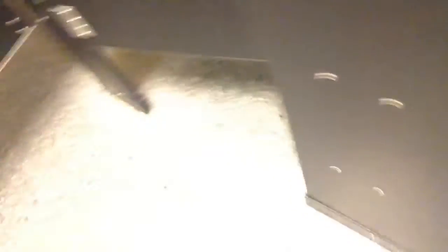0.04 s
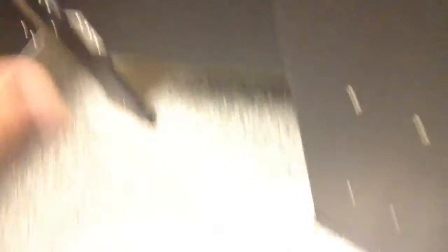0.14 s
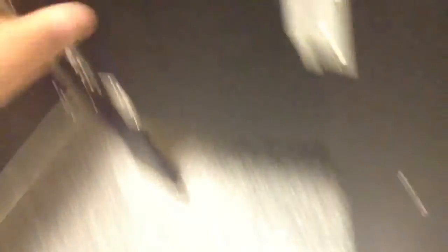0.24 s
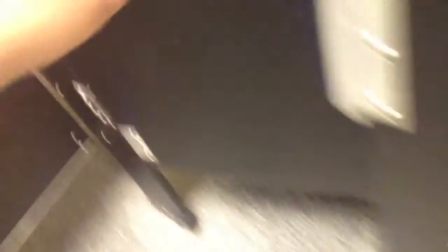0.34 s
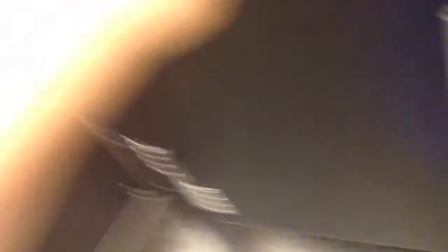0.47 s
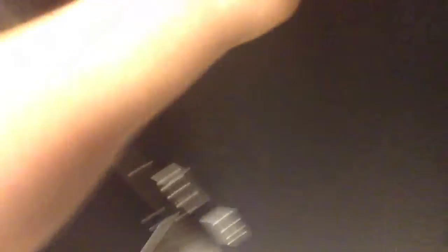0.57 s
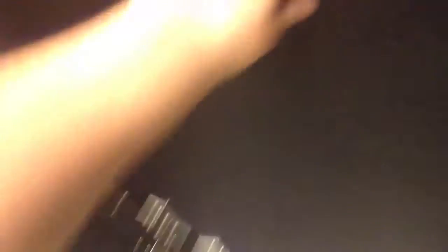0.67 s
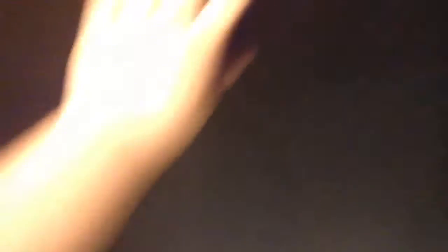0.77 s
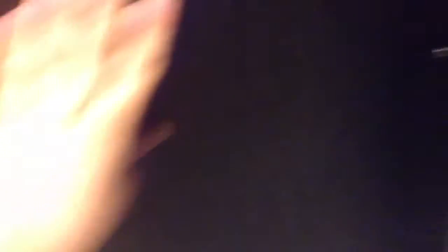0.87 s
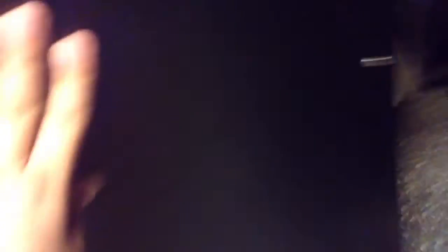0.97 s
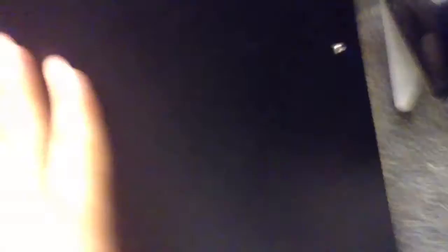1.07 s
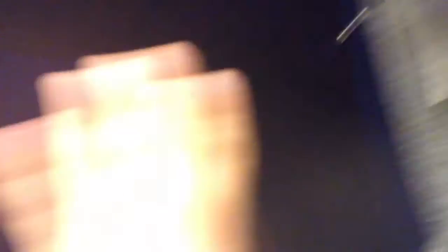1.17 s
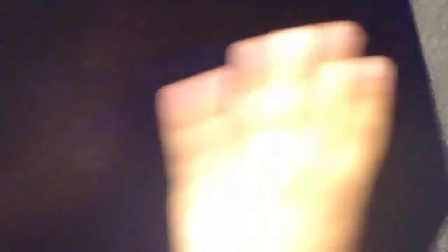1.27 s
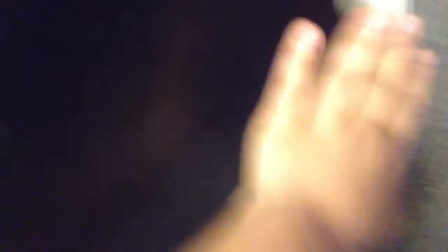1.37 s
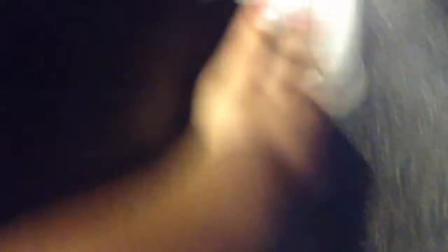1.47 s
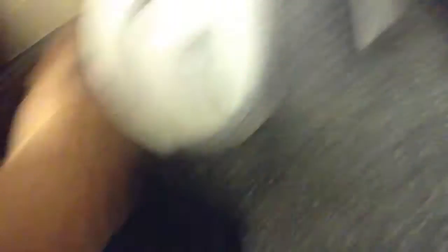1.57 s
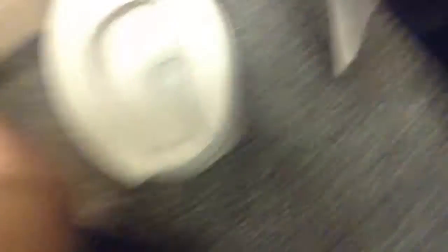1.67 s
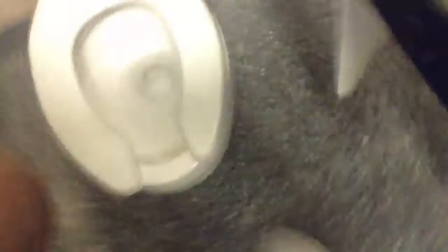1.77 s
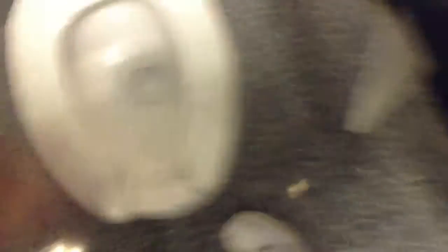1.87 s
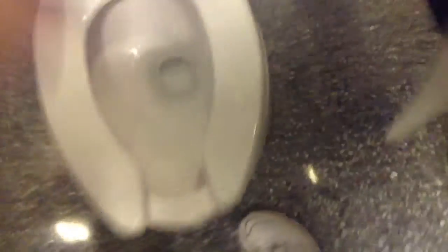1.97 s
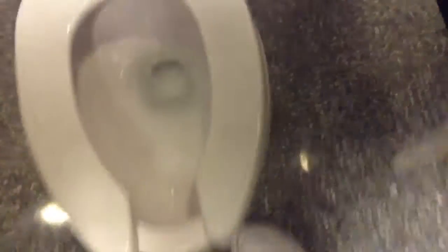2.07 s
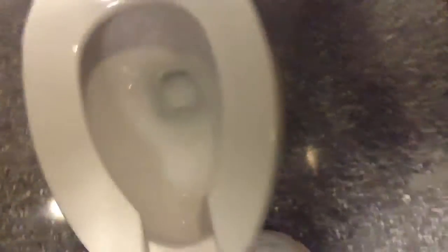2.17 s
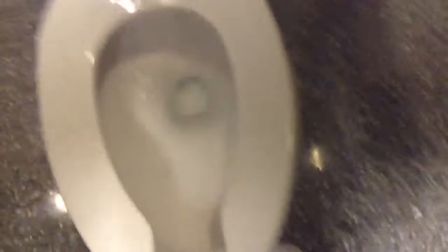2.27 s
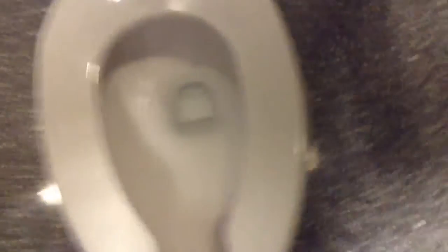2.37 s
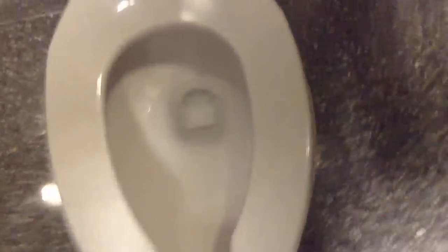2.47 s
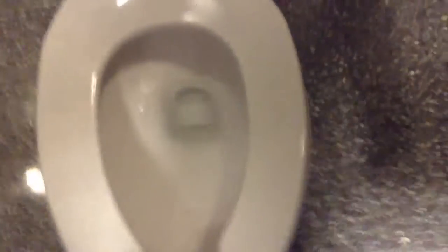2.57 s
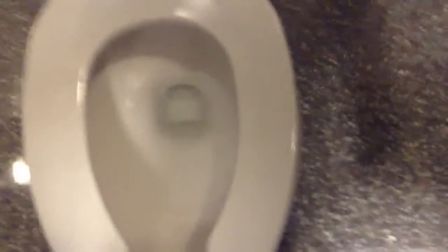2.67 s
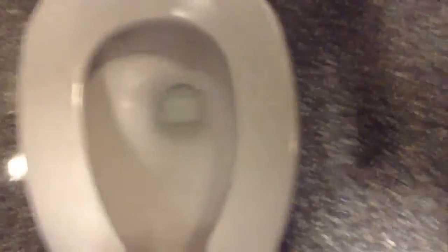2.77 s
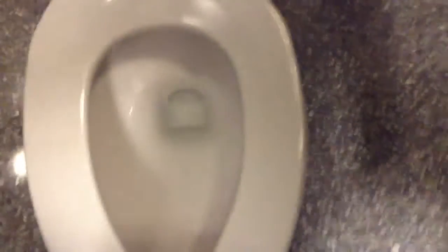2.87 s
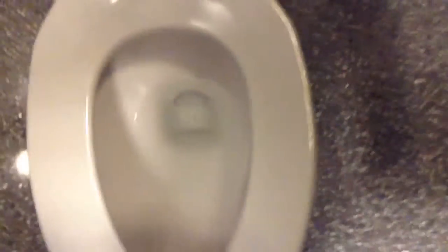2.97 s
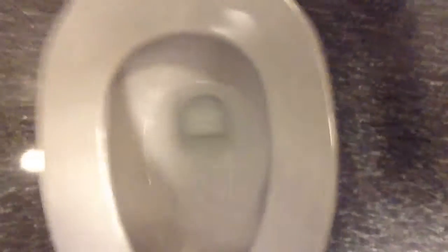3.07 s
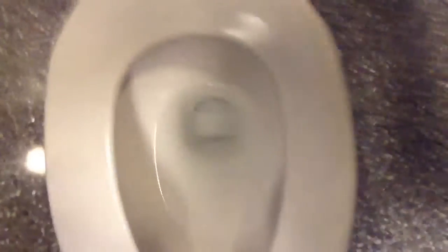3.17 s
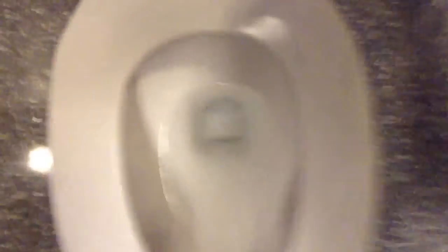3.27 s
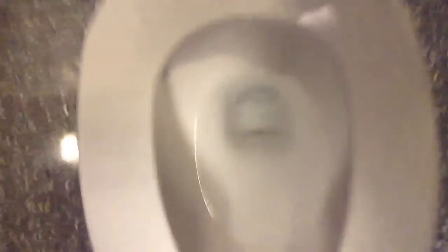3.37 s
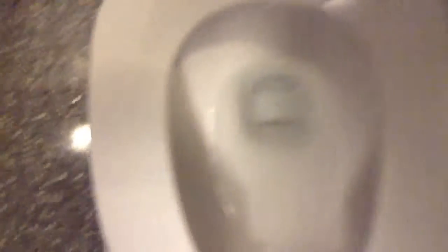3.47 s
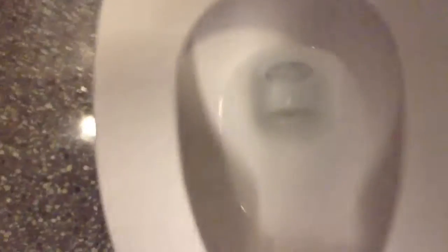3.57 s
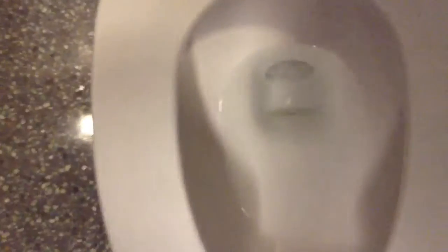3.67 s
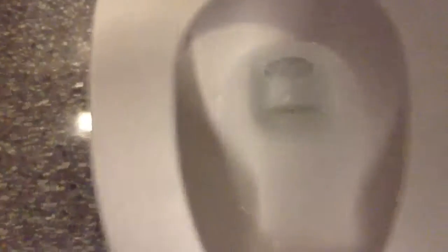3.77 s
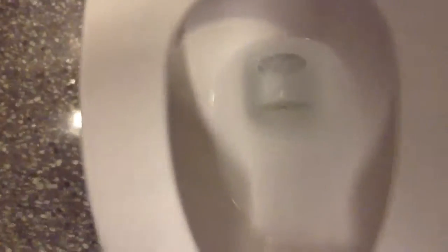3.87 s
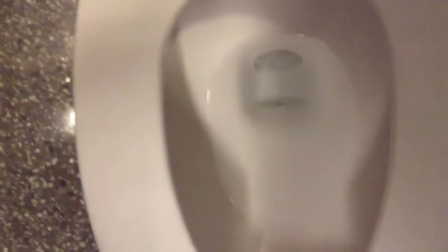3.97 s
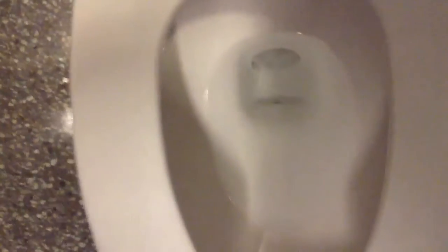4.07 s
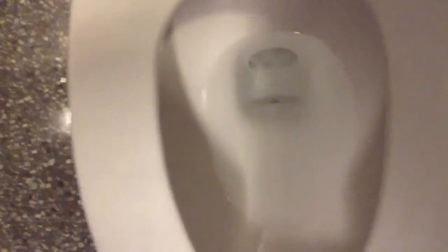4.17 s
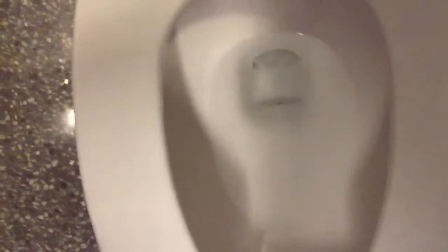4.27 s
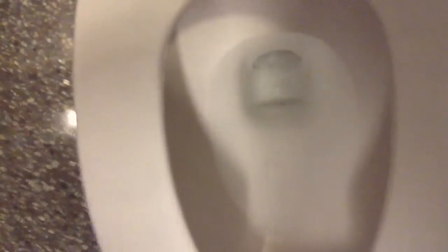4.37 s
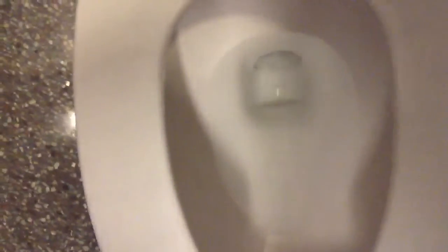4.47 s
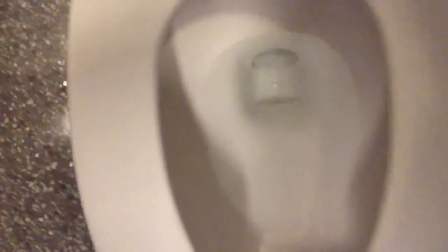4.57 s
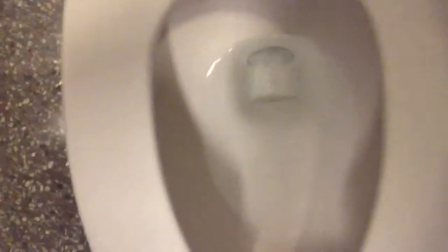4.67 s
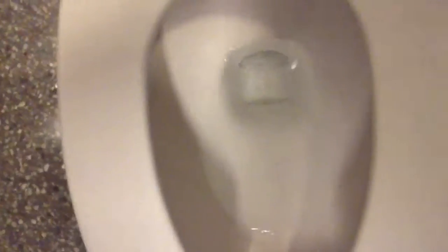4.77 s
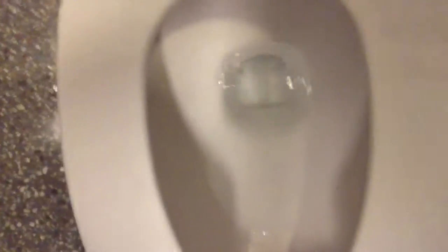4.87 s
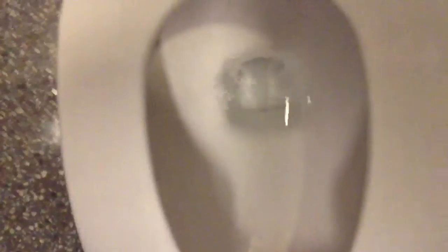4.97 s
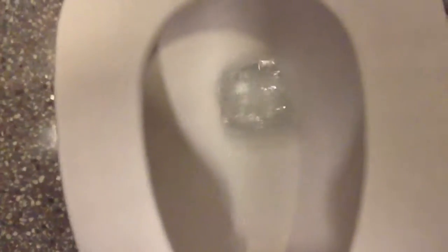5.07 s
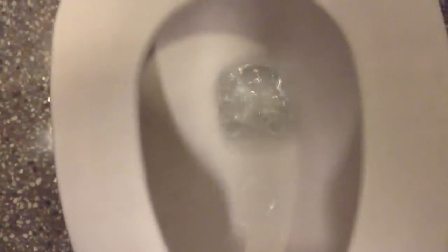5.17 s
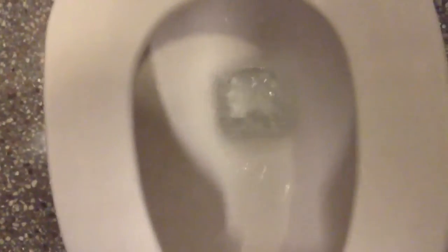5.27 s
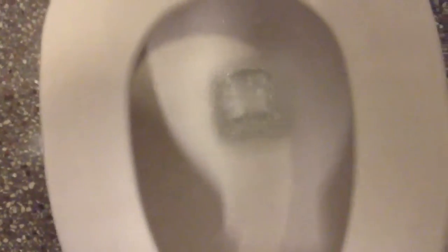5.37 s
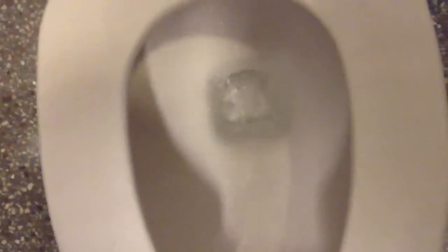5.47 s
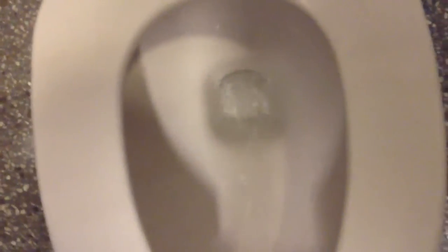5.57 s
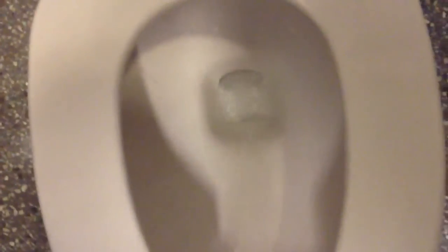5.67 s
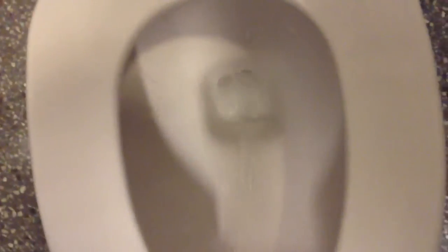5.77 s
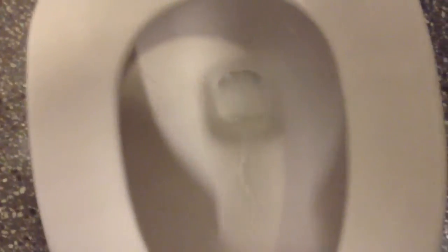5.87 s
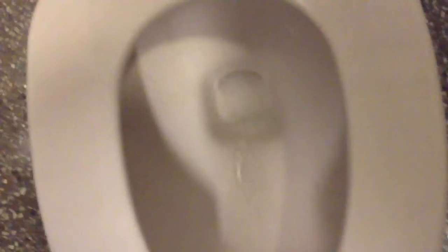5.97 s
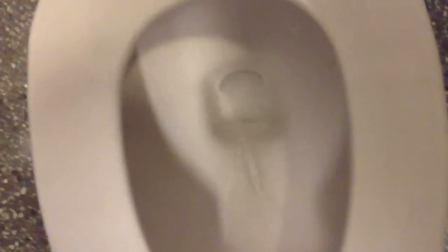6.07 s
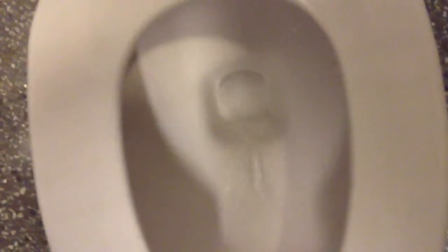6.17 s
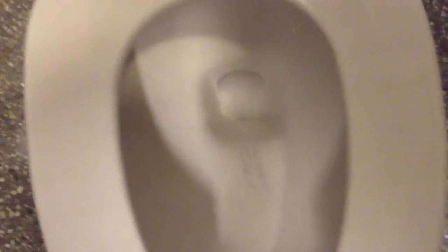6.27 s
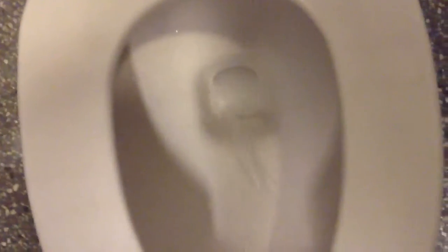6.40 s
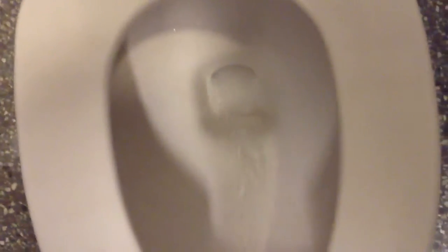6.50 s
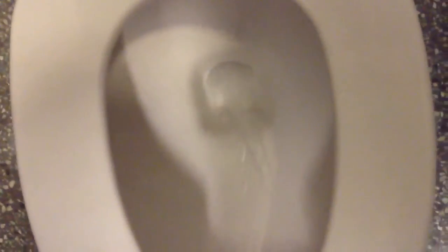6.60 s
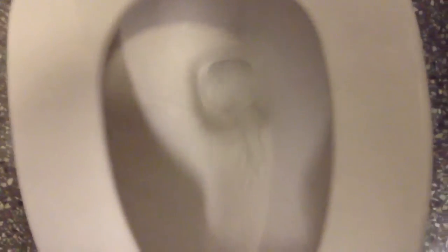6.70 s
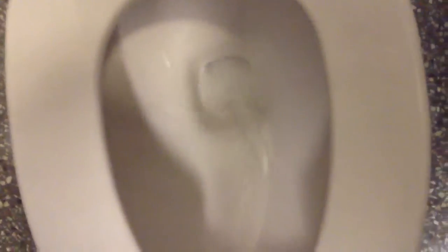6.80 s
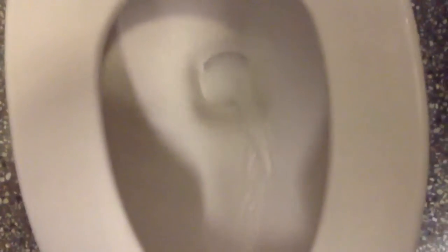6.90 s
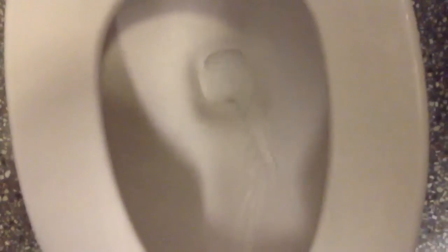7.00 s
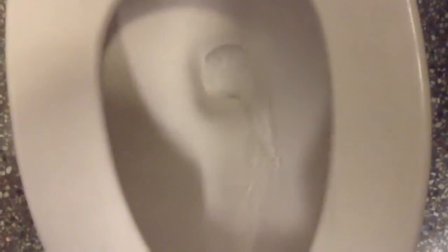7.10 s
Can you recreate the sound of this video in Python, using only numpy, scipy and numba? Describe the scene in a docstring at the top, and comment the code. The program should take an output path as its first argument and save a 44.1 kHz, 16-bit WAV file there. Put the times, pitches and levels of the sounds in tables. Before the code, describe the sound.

A small tiled restroom with short, bright echo and very quiet low ventilation. From 0 to 4 s someone moves about: dull bumps around 0.5, 1.1 and 2.6 s, gritty shoe shuffles, faint sleeve rustle, thin squeaks, and short door and metal-fitting clacks, clearest near 0.8, 1.2, 1.7 and 3.7 s. Dry finger taps touch the microphone around 1.3 and 2.4-2.6 s. At 4.15 s the flush valve clunks open; by 4.4 s a pressure burst hisses with a thin brief whistle, over a low, heaving drone and a wavering pipe note that rises, then sinks by about 5.2 s. Gurgling boils up near 4.9 s, and hiss and drone swell again towards 5.7 s. At 5.77 s the siphon breaks: very loud, close gulps falling in pitch, hard wet slaps, bubbly splashes and fizzing spray surge irregularly, with soft low thumps, continuing until the end just after 7 s.

```python
"""Flushing a restroom toilet

Someone pushes into a tiled stall: door and metal fittings knock as decaying noise bands, shoes scuff and squeak.
A flush valve snaps open; a submerged jet drones in the china bowl, made of many short damped sines (bubbles),
under the hiss of the valve, which is coloured noise.
The bowl empties, the siphon gulps air, and the bared jet splashes loudly close to the microphone."""
import sys
import numpy as np
from scipy import signal
from scipy.fft import rfft, irfft
from scipy.io import wavfile
from scipy.ndimage import uniform_filter1d, minimum_filter1d
from numba import njit

SR = 44100
rng = np.random.default_rng(int(sys.argv[2]) if len(sys.argv) > 2 else 0)


def int16_out(signal):
    """Quantize to a 16-bit WAV file."""
    q = np.round(np.clip(np.atleast_2d(signal).T, -1, 1) * 32767)
    wavfile.write(sys.argv[1], SR, q.astype(np.int16))


N = 314874
TIME = np.arange(N) / SR
TOP_HZ = 15250  # bubbles stay below this pitch, and the final mix is cut above it

# the valve cracks open, is fully open, and the siphon breaks (seconds)
OPEN_S, FULL_S, SIPHON_S = 4.147, 4.4, 5.768
# the first rush of pressure dies away; the water over the jet thins out (time constants in seconds)
SETTLE_S, SHALLOW_S = 0.19, 0.22
ROOM_T60_S, ROOM_TREBLE_T60_S = 0.49, 0.53  # time for the echo to fall 60 dB


def undb(db):
    """Decibels to gain."""
    return 10 ** (np.asarray(db) / 20)


def unit(x):
    """Scale to rms 1."""
    return x / np.sqrt(np.mean(x ** 2) + 1e-20)


def noise_burst(t):
    """White noise, one sample for each moment in t."""
    return rng.standard_normal(len(t))


def after(s, rise_s):
    """A gate that opens at a given time."""
    return np.clip((TIME - s) / rise_s, 0, 1)


def fade(t, t60):
    """Free decay: 60 dB down after t60 seconds."""
    return np.exp(-np.log(1000) * t / max(t60, 1e-3))


def swell(s, length, rise_s, fall_s):
    """An envelope that rises, holds until its length is over, then dies away."""
    fall = np.exp(-np.maximum(TIME - s - length, 0) / max(fall_s, 1e-3))
    return after(s, max(rise_s, 1e-3)) * fall


def hump(s, width_s):
    """A smooth rise and fall around a crest."""
    return np.exp(-((TIME - s) / width_s) ** 2)


def add(out, s, x):
    """Mix a sound in at a given time."""
    i = max(int(s * SR), 0)
    out[i:i + len(x)] += x[:max(N - i, 0)]


def walk(rate):
    """Smooth random wavering with rms 1, drawn anew about rate times a second."""
    k = max(int(SR / rate), 2)
    steps = rng.standard_normal(N)[np.arange(N) // k]
    return unit(uniform_filter1d(steps, k))


def colour(x, points, modes=(), size=8192):
    """Causal filter: a smooth spectrum with resonances raised on it; rms 1 out."""
    f = np.maximum(np.fft.rfftfreq(size, 1 / SR), 1)
    hz, db = np.transpose(points)
    outside = np.abs(np.log(f / np.clip(f, hz[0], hz[-1])))
    curve = np.interp(np.log(f), np.log(hz), db) - 20 * outside
    for centre, width, lift in modes:
        curve = curve + lift / (1 + (2 * (f - centre) / width) ** 2)
    # folding the cepstrum gives a filter that answers at once (minimum phase)
    cepstrum = irfft(np.log(undb(curve)))[:size // 2]
    cepstrum[0] = 0
    response = irfft(np.exp(rfft(2 * cepstrum, size)))[:size // 2]
    return unit(signal.oaconvolve(x, response)[:len(x)])


def band(x, hz, spread):
    """Band-pass reaching a factor 1 + spread to each side; rms 1 out."""
    edges = [hz / (1 + spread), min(hz * (1 + spread), SR / 2 - 100)]
    return unit(signal.sosfilt(signal.butter(2, edges, "band", fs=SR, output="sos"), x))


@njit
def ring(starts, hz, cycles, sizes, glide):
    """Each bubble is a damped sine; a positive glide raises its pitch as it nears the surface."""
    out = np.zeros(N)
    for k in range(len(starts)):
        life = cycles[k] * SR / hz[k]  # in samples
        turn = 2 * np.pi * hz[k] / SR
        z = sizes[k] + 0j
        step = np.exp(1j * turn - 5 / life)
        bend = np.exp(1j * turn * glide / life)
        for i in range(starts[k], min(starts[k] + int(life), N)):
            out[i] += z.imag
            z, step = z * step, step * bend
    return out


def bubbles(centre_hz, octaves, cycles, scatter_db, glide, count):
    """A cloud of count bubbles a second around a pitch; scatter makes most small and a few large."""
    place, pitch, life, size = rng.random((count * N // SR, 4)).T
    starts = (place * N).astype(np.int64)
    centres = (centre_hz * np.ones(N))[starts]
    hz = np.minimum(centres * 2 ** (octaves * (2 * pitch - 1)), TOP_HZ)
    sizes = undb(-scatter_db * np.log(size + .01))
    return unit(ring(starts, hz, cycles * (.5 + life), sizes, float(glide)))


def tiles(x, wet_db):
    """Hard walls close by: a dense echo whose low and high bands each die at their own rate."""
    t = TIME[:SR]
    low = band(noise_burst(t), 705, 2.15) * fade(t, ROOM_T60_S)
    high = band(noise_burst(t), 10200, 2.06) * fade(t, ROOM_TREBLE_T60_S)
    tail = unit((low + 2.57 * high) * np.clip(t / 0.01, 0, 1)) / np.sqrt(SR)
    return x + undb(wet_db) * signal.oaconvolve(x, tail)[:N]


# Tone of the ventilation. Each row: frequency in Hz, level in dB.
AIR_COLOUR = [(30, -28), (70, -8), (130, 0.5), (220, 1.5), (330, -7), (450, -26), (650, -13.5),
              (1000, -16.5), (2200, -15.5), (4500, -35), (6500, -27), (15000, -34.5)]


def ventilation(level_db=-62.5):
    """Moving air makes a low noise whose level wavers gently."""
    return undb(level_db + walk(3.55)) * colour(rng.standard_normal(N), AIR_COLOUR)


# Soft bumps of hand and feet. Each row: start in seconds, level in dB, pitch in Hz, 60 dB decay in seconds.
SOFT_BUMPS = [(.395, -51, 290, 0.69), (0.486, -40.5, 320, 0.26), (.52, -47, 475, 0.17),
              (1.082, -35, 162, 0.37), (1.113, -39, 170, .3), (1.16, -43, 157, 0.59), (1.2, -49, 300, 0.5),
              (1.335, -41, 230, 0.25), (1.573, -44.5, 163, 0.46), (1.614, -45, 199, 0.095),
              (1.994, -41.5, 275, 0.24), (2.555, -30, 170, 0.034), (2.646, -38, 199, 0.033)]
# Faint thin tones and short scrapes.
# Each row: start in seconds, length in seconds, pitch in Hz, level in dB, width relative to the pitch.
FAINT_TONES = [(0.005, 0.021, 990, -51.5, 0.65), (0.106, 0.089, 4170, -70.5, 0.016),
               (0.206, 0.074, 1970, -63, 0.023), (0.492, 0.031, 3330, -52, .03),
               (0.517, 0.1, 7950, -67, 0.05), (0.686, 0.077, 4530, -53.5, 0.15),
               (0.975, 0.053, 1800, -57.5, .06), (1.444, 0.076, 5370, -62.5, 0.24),
               (2.37, 0.043, 4770, -67, .1), (2.798, 0.048, 2840, -60, .08), (3.038, 0.067, 2500, -59, .1),
               (3.366, 0.057, 2970, -62, .06), (3.977, 0.11, 1330, -62, 0.044)]
# Shoes shuffle on the tiles. Each row: start in seconds, length in seconds, level in dB.
SHOE_SHUFFLES = [(0.25, 0.1, -62), (0.397, 0.19, -51.5), (0.68, 0.13, -51), (1.11, 0.32, -53),
                 (1.835, 0.16, -54.5), (2.35, 0.12, -55.5), (3.047, 0.03, -78), (3.31, 0.05, -71),
                 (3.74, 0.16, -61.5)]
# Sleeves rustle. Each row: start in seconds, length in seconds, level in dB.
SLEEVE_RUSTLES = [(0.0, 0.019, -60), (0.396, 0.1, -62.5), (1.24, 0.16, -64.5), (1.464, 0.15, -66.5),
                  (1.987, 0.066, -61), (2.378, 0.27, -62.5)]


def movement(grit_db=-62, cloth_db=-79):
    """Bumps, thin tones and scrapes are bands of noise; shoes and sleeves are clouds of tiny damped sines."""
    out, t = np.zeros(N), TIME[:SR // 2]
    for s, db, hz, t60 in SOFT_BUMPS:
        thud = band(band(noise_burst(t), hz, 0.54), hz, 0.54)
        add(out, s, undb(db) * thud * fade(t, t60) * np.minimum(t / 0.003, 1))
    for s, length, hz, db, width in FAINT_TONES:
        arch = np.sin(np.pi * np.minimum(t / length, 1))
        add(out, s, undb(db) * band(noise_burst(t), hz, width) * arch)
    grit = bubbles(1320, octaves=2.066, cycles=10.3, scatter_db=4.0, glide=0, count=4000)
    grit_colour = [(200, 15), (450, -8.5), (650, 1), (1200, -2), (2200, -1), (4500, 0.5), (7000, -12.0)]
    grit = colour(grit, grit_colour)  # (Hz, dB)
    cloth = bubbles(5300, octaves=0.83, cycles=1.2, scatter_db=1.5, glide=0, count=3000)
    scuff = sum(undb(db) * swell(s, length, 0.047, 0.089) for s, length, db in SHOE_SHUFFLES)
    rustle = sum(undb(db) * swell(s, length, 0.0067, 0.023) for s, length, db in SLEEVE_RUSTLES)
    # a faint stir goes on, then fades as the person comes to stand still at the bowl
    walking = swell(0, 2.7, 0.0036, 1.0)
    scuff = np.hypot(scuff, undb(grit_db) * walking)
    rustle = np.hypot(rustle, undb(cloth_db) * walking)
    return out + scuff * grit + rustle * cloth


# Knocks of door, fittings and shoes. Each row: start in seconds, level in dB, main pitch in Hz,
# brightness in dB, 60 dB decay in seconds, contact time in seconds.
DOOR_KNOCKS = [(0.393, -45, 530, -17, 0.16, 0.0016), (0.485, -41, 993, -32, 0.046, 0.0015),
               (0.758, -40, 1350, -21, 0.075, 0.002), (0.796, -28.5, 2440, -21, 0.05, 0.0025),
               (1.165, -26, 1440, -47, 0.053, 0.0027), (1.229, -33.5, 2400, -16, 0.051, 0.0012),
               (1.331, -43.5, 800, -36, 0.13, 0.0022), (1.574, -48.5, 600, -25, 0.16, 0.0016),
               (1.714, -28.5, 2240, 1, 0.13, 0.0024), (1.995, -38.5, 720, -43, 0.18, 0.0025),
               (2.47, -36.5, 2100, -39, 0.11, 0.0025), (2.872, -36, 2050, -2.5, 0.11, 0.0032),
               (3.246, -36, 1920, -28, 0.11, 0.0052), (3.519, -42, 2040, -7, 0.12, 0.0011),
               (3.731, -27.5, 2100, -8.5, 0.086, 0.0048), (4.158, -30, 2440, 10, 0.018, 0.0012)]
# Tone of the clack. Each row: frequency in Hz, level in dB.
CLACK_COLOUR = [(100, -10.5), (300, -3), (700, -1.5), (1300, 9), (2100, 7), (3400, 2), (4700, -5),
                (6000, -57), (9000, -19), (15000, -71)]
# Ringing of the steel fitting. Each row: frequency in Hz, level in dB, 60 dB decay in seconds.
STEEL_MODES = [(1988, -6, 0.12), (2210, -2, 0.089), (3400, 3.5, 0.047), (4570, -5.5, 0.17),
               (6700, -8, 0.077), (7750, -7, 0.13), (8940, -7, 0.17), (11300, -31, 0.1), (14950, -20, 0.13)]


def knocks(metal_db=-10, metal_slope=0.27, overtone=2.234, overtone_db=-11):
    """Panel and latch clatter briefly; the steel fitting rings on, its modes smeared by its loose seat."""
    out, t = np.zeros(N), TIME[:SR // 2]
    for s, db, hz, bright_db, t60, contact_s in DOOR_KNOCKS:
        noise = noise_burst(t)
        clack = undb(-3.5) * (colour(noise, CLACK_COLOUR) + band(noise_burst(t), hz, 0.21))
        clack = clack + undb(bright_db - 12.5) * band(noise, 9800, 0.51)
        clack = clack + undb(overtone_db) * band(noise_burst(t), overtone * hz, 0.097)
        # dull contacts wake the high modes less
        hardness_db = metal_slope * min(bright_db - 1, 0)
        metal = 0
        for mode_hz, mode_db, life in STEEL_MODES:
            gain = undb(mode_db + hardness_db * np.log2(mode_hz / 1900))
            metal = metal + gain * band(noise, mode_hz, 0.018) * fade(t, life)
        contact = np.minimum(t / max(contact_s, 1e-4), 1)
        add(out, s - .001, undb(db) * contact * (clack * fade(t, t60) + undb(metal_db) * metal))
    return out


# Fingers tap on the microphone's housing.
# Each row: start in seconds, level in dB, pitch in Hz, 60 dB decay in seconds.
FINGER_TAPS = [(1.344, -42.5, 2050, .032), (2.4155, -37.5, 2250, .036), (2.5562, -41.5, 3100, .028),
               (2.6462, -44.5, 3400, .026)]


def ticks():
    """Taps on the housing are short noise bands that never reach the room, so they stay dry."""
    out, t = np.zeros(N), TIME[:SR // 8]
    for s, db, hz, t60 in FINGER_TAPS:
        add(out, s, undb(db) * band(noise_burst(t), hz, 0.61) * fade(t, t60))
    return out


def rush(hold_s=0.043):
    """The burst of pressure as the valve opens fully, 0-1."""
    return swell(FULL_S, hold_s, 0.037, SETTLE_S)


def shallow():
    """How bare the jet lies as the bowl empties, 0-1."""
    return np.exp(np.minimum(TIME - SIPHON_S, 0) / SHALLOW_S)


# Tone of the drone. Each row: frequency in Hz, level in dB.
JET_COLOUR = [(40, -72), (80, -30.5), (125, -36.5), (200, -21), (270, -3), (320, 5), (360, -18), (450, -17),
              (600, -76)]
# Low modes of the filled bowl and trap. Each row: frequency in Hz, width in Hz, lift in dB.
BOWL_TRAP_MODES = [(160.4, 4.9, 11), (219.3, 10.1, 16.5), (303, 28, 3.5), (403, 20, 10.5)]
# The water heaves over the jet. Each row: time of the crest in seconds, lift in dB.
WATER_HEAVES = [(4.295, 6), (4.355, 2), (4.39, 9.5), (4.484, 10.5), (4.576, 8), (4.68, 5.5), (4.911, 10.5),
                (5.006, 11), (5.317, 9), (5.44, 5), (5.53, 2), (5.615, 7), (5.699, 7), (6.29, 9), (6.68, 8)]


def drone(throb_db=0.8, body_db=-28.5, shallow_db=9, drained_db=-15, heave_width_s=0.017,
          rumble_db=-44, rush_db=10, ebb_db=-9, ebb_s=5.28, deep_hz=270, shallow_octaves=1.0):
    """The turbulent jet shakes the water and the low modes of bowl and trap; the drain rumbles below."""
    # louder and higher as the water thins, weak once the bowl has drained
    drained = after(SIPHON_S - .05, 0.099)
    depth_db = shallow_db * shallow() + drained_db * drained
    hz = deep_hz * 2 ** (shallow_octaves * shallow() * (1 - drained))
    body = bubbles(hz, octaves=0.84, cycles=1.92, scatter_db=2, glide=0.077, count=1500)
    body = colour(body, JET_COLOUR, BOWL_TRAP_MODES)
    # steady supply pressure holds the power even from moment to moment
    body = body / np.sqrt(uniform_filter1d(body ** 2, int(0.061 * SR)) + 1e-3)
    heave_db = sum(db * hump(s, heave_width_s) for s, db in WATER_HEAVES)
    body = body * undb(body_db + heave_db + depth_db + throb_db * walk(45))
    rumble_colour = [(30, -33), (70, -35), (105, -6), (155, -7), (172, 5.5), (190, 1.5), (300, -45)]
    rumble = colour(rng.standard_normal(N), rumble_colour)  # (Hz, dB)
    rumble = rumble * undb(rumble_db + rush_db * rush() + ebb_db * after(ebb_s, 0.14))
    return (body + rumble) * after(OPEN_S, 0.0035)


# Tone of the gurgling pipe. Each row: frequency in Hz, level in dB.
GURGLE_COLOUR = [(300, -16), (400, -8), (470, -12), (560, 0.5), (720, -3), (1000, 1), (1280, -0.5),
                 (1450, -3.5), (2200, -4.5)]
# Ringing of the supply pipe. Each row: frequency in Hz, width in Hz, lift in dB.
PIPE_MODES = [(397, 21, 7), (551, 22, 5), (779, 19, 13), (984, 45, 5), (1026, 25, 4), (1242, 48, 6)]
# Tone of the hiss. Each row: frequency in Hz, level in dB.
VALVE_COLOUR = [(700, -35), (1500, 0.5), (2800, 5), (4000, 4), (5100, 6.5), (5800, 0.5), (7500, 2.5),
                (10500, -1), (13000, -1), (15500, -6.5)]
# Resonances in the hiss. Each row: frequency in Hz, width in Hz, lift in dB.
VALVE_MODES = [(1676, 20, 13.5), (1950, 42, 12), (2234, 150, 9.5), (2887, 33, 7.5), (3400, 240, 1),
               (5200, 180, 1)]
# first-crack level, lift when fully open, lift with the bowl nearly empty (dB)
HISS_DB, HISS_OPEN_DB, HISS_BARE_DB = -38, 4, 5
GURGLE_DB, GURGLE_OPEN_DB, GURGLE_BARE_DB = -44.5, 10.5, 8.5


def valve(rush_db=6.5, boil_db=8.5, boil_s=4.92, boil_width_s=0.069, masked_db=-6):
    """Water forced through the valve hisses and gurgles, until the open jet takes over."""
    gurgle = bubbles(788, octaves=1.175, cycles=22.0, scatter_db=1.0, glide=0.052, count=600)
    gurgle = colour(gurgle, GURGLE_COLOUR, PIPE_MODES)
    hiss = colour(rng.standard_normal(N), VALVE_COLOUR, VALVE_MODES) * undb(1.5 * walk(60))
    # both grow with the opening and as the bowl empties; the gurgle boils up once on the way
    gurgle_db = GURGLE_DB + GURGLE_OPEN_DB * after(FULL_S - .05, 0.26) + GURGLE_BARE_DB * shallow()
    gurgle_db = gurgle_db + boil_db * hump(boil_s, boil_width_s)
    hiss_db = HISS_DB + HISS_OPEN_DB * after(FULL_S, 0.064) + HISS_BARE_DB * shallow()
    hiss_db = hiss_db + rush_db * rush()
    flow = gurgle * undb(gurgle_db) + hiss * undb(hiss_db)
    return flow * after(OPEN_S, 0.00088) * undb(masked_db * after(SIPHON_S, 0.1))


# Clunks of the valve and slaps of water. Each row: time in seconds, level in dB, pitch in Hz.
WATER_SLAPS = [(4.148, -17.5, 370), (4.158, -22, 2340), (4.16, -14.5, 385), (4.213, -30.5, 1460),
               (4.425, -24, 930), (4.676, -24, 566), (4.724, -16.5, 1170), (5.65, -11.5, 604),
               (5.772, -4, 830), (5.809, -4, 950), (5.903, -3.5, 970), (6.023, -3, 890),
               (6.121, -8.5, 2380), (6.271, -1.5, 797), (6.283, -4, 850), (6.385, -6, 2480),
               (6.453, -8, 3030), (6.585, -12, 1170), (6.66, -9, 1220), (6.724, -9, 2190),
               (6.981, -5, 1270), (7.009, -11, 3400)]


def slaps(t60=0.085, rise_s=.002):
    """Valve clunks, water hitting china and bursting air pockets: a short dull note with a wet smack."""
    out, t = np.zeros(N), TIME[:SR // 4]
    for s, db, hz in WATER_SLAPS:
        note = band(noise_burst(t), hz, 0.076)
        smack = undb(-13) * band(noise_burst(t), 2 * hz, 0.55)
        envelope = fade(t, t60) * np.minimum(t / rise_s, 1)
        add(out, s - rise_s, undb(db - 3.5) * (note + smack) * envelope)
    return out


def pipe_song(waver=0.018, song_db=-29.5, top_hz=598, crest_s=4.65, sag_hz_per_s2=270):
    """The supply pipe sings a rough, wavering note that rises to a crest and sinks as the pressure drops."""
    hz = top_hz - sag_hz_per_s2 * np.minimum((TIME - crest_s) ** 2, 0.3)
    phase = 2 * np.pi * np.cumsum(hz * (1 + waver * walk(40))) / SR
    song = unit(walk(90) * np.sin(phase) + walk(90) * np.cos(phase))
    return song * undb(song_db) * swell(4.195, 0.82, 0.39, 0.1)


# Whistling notes of the valve seat. Each row: pitch in Hz, level in dB relative to one another.
SEAT_NOTES = [(3142, 9), (3380, -9), (4362, 5), (4537, 12), (4676, -12)]


def whistle(whistle_db=-32.5, fizz_db=-42):
    """The valve seat whistles a few thin, unsteady notes at full flow, with a fine high fizz."""
    notes = sum(undb(db) * band(rng.standard_normal(N), hz, .004) for hz, db in SEAT_NOTES)
    fizz = band(rng.standard_normal(N), 12700, 0.13)
    return unit(notes) * undb(whistle_db) * rush(hold_s=0.12) + fizz * undb(fizz_db) * rush(hold_s=0.38)


# The trap gulps air and chokes the jet. Each row: start in seconds, length in seconds, level in dB,
# first pitch in Hz, how far the spray is choked in dB (negative lifts it).
AIR_GULPS = [(5.726, 0.037, -23.5, 715, -2), (5.78, 0.061, -19.5, 910, -1.5), (5.896, 0.07, -17.5, 960, 9),
             (5.996, 0.068, -16.5, 1040, 4.5), (6.175, 0.012, -16.5, 1140, -1.5),
             (6.233, 0.06, -11.5, 1220, 4), (6.317, 0.021, -18.5, 1400, 0.5),
             (6.942, 0.031, -18, 1310, 0.5)]


def gulping(churn_db=-26, churn_hz=1060, sag_oct_per_s=5.7, rise_s=0.0037, fall_s=0.023):
    """Gulps stand out of the churning and sink in pitch as the air pocket grows: gain, pitch Hz, choke dB."""
    gain = undb(churn_db) * after(SIPHON_S, 0.02)
    hz, choke_db = np.full(N, float(churn_hz)), 0
    for s, length, db, first_hz, choked_db in AIR_GULPS:
        shape = swell(s, length, rise_s, fall_s)
        gain = np.hypot(gain, undb(db) * shape)
        sinking_hz = first_hz * 2 ** (-sag_oct_per_s * np.clip(TIME - s, 0, length))
        hz = hz + shape * (sinking_hz - hz)
        choke_db = choke_db + choked_db * shape
    return gain, hz, choke_db


def spatter(per_s, t60):
    """Drops land in random volleys: a train of sharp rises and quick decays; mean 1."""
    volleys = (rng.random(N) < per_s / SR) * rng.exponential(size=N)
    envelope = signal.oaconvolve(volleys, fade(TIME[:SR // 10], t60))[:N]
    return envelope / envelope.mean()


# The open jet surges against the china.
# Each row: start in seconds, length in seconds, splash lift in dB, spray lift in dB.
JET_SURGES = [(5.818, 0.06, 5.5, -2), (5.97, 0.14, 2.5, 4), (6.073, 0.12, 5, -0.5), (6.218, 0.037, 6.5, -4),
              (6.346, 0.13, 4, 6), (6.515, 0.056, 1.5, 4.5), (6.569, 0.024, 5.5, -1),
              (6.65, 0.049, 3.5, 3.5), (6.706, 0.045, 5, -4), (6.955, 0.046, 1.5, -1),
              (7.105, 0.05, -0.5, -1)]
# The empty china bowl rings. Each row: frequency in Hz, width in Hz, lift in dB.
CHINA_MODES = [(608, 33, 2), (701, 15, -0.5), (810, 12, 1), (874, 25, 3), (977, 41, -4), (1037, 12, 5.5),
               (1114, 23, 1.5), (1382, 68, 6.5), (1454, 120, -10.5), (1602, 19, 2.5), (1877, 120, 7),
               (2120, 84, -6), (2245, 170, 8), (2777, 100, 6)]
# Tone of the splashes. Each row: frequency in Hz, level in dB.
SPLASH_TONE = [(500, -3.5), (1200, -2), (2300, 3.5), (3200, 2), (4500, 2), (6000, -22), (9000, -30)]
# Tone of the fine spray. Each row: frequency in Hz, level in dB.
SPRAY_TONE = [(3000, -1), (6000, -6.5), (7500, -1), (10500, -1), (12000, -3.5), (14000, -2.5), (15500, -5)]


def open_jet(splash_db=-22, spray_db=-23, surge_db=1.85, flutter_db=0.54, volley=0.4, splash_choke=0.31):
    """Big air pockets gulp in the trap; the jet breaks into bubbly splashes and fine spray that surge."""
    gulp_gain, gulp_hz, choke_db = gulping()
    splash_db, spray_db = splash_db - splash_choke * choke_db, spray_db - choke_db
    for s, length, splash_lift_db, spray_lift_db in JET_SURGES:
        shape = swell(s, length, 0.0095, 0.0071)
        splash_db = splash_db + splash_lift_db * shape
        spray_db = spray_db + spray_lift_db * shape
    gulps = bubbles(gulp_hz, octaves=0.55, cycles=6.2, scatter_db=3, glide=0.36, count=700)
    gulps = colour(gulps, [(400, -16), (600, 0.5), (1300, 4.5), (2500, 0.0)], CHINA_MODES)
    splash = bubbles(2710, octaves=1.25, cycles=15.8, scatter_db=2.5, glide=0.081, count=3000)
    splash = colour(splash, SPLASH_TONE, CHINA_MODES)
    spray = bubbles(8740, octaves=1.0, cycles=3.4, scatter_db=0, glide=.05, count=14000)
    spray = colour(spray, SPRAY_TONE)
    spray = spray * (1 - volley + volley * spatter(per_s=160, t60=0.11))
    bared = after(SIPHON_S - .005, 0.0068)
    layers = (gulps * gulp_gain, splash * undb(splash_db) * bared, spray * undb(spray_db) * bared)
    # each layer flutters on its own, then all waver together
    return sum(x * undb(flutter_db * walk(110)) for x in layers) * undb(surge_db * walk(55))


# Soft low thumps under the splashing. Each row: time of the crest in seconds, level in dB.
LOW_THUMPS = [(5.82, -60), (5.865, -48), (6.095, -54), (6.245, -47), (6.585, -53), (6.72, -61),
              (7.005, -54)]


def thumps(width_s=0.024):
    """Brief soft low thumps under the splashing: low noise shaped into smooth humps."""
    humps = sum(undb(db) * hump(s, width_s) for s, db in LOW_THUMPS)
    return humps * band(rng.standard_normal(N), 55, 0.74)


def scene():
    """The bowl is close; door and shoes are heard more through the room."""
    person = tiles(knocks() + movement(), wet_db=-4.5)
    water = tiles(valve() + slaps() + pipe_song() + whistle() + open_jet(), wet_db=-8)
    return (ventilation() + person + ticks() + drone() + water + thumps())[None]


def record(dry, ceiling=0.85, hold_s=0.0065):
    """A fast limiter dips the whole level around peaks above the ceiling, and the top is cut."""
    size = max(int(hold_s * SR), 2)
    needed = ceiling / np.maximum(np.abs(dry), ceiling)
    gain = uniform_filter1d(minimum_filter1d(needed, size), size)
    return signal.sosfilt(signal.ellip(10, .2, 80, TOP_HZ, fs=SR, output="sos"), dry * gain)


dry = scene()
out = record(dry)
int16_out(out)
```